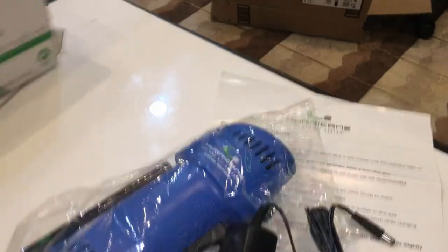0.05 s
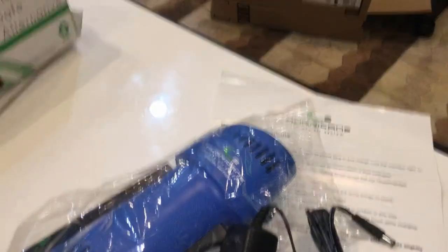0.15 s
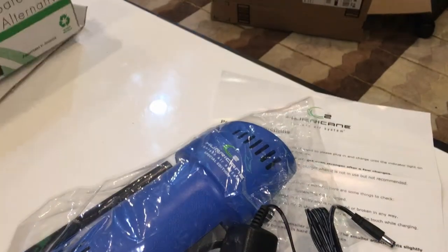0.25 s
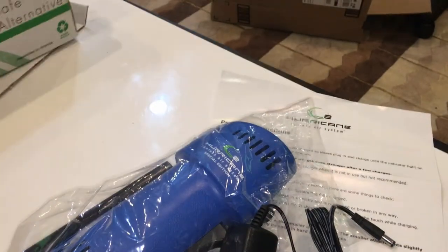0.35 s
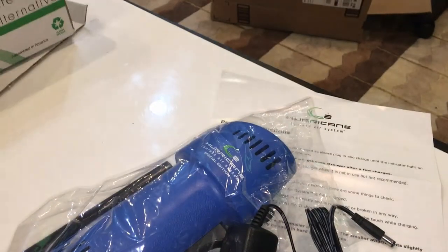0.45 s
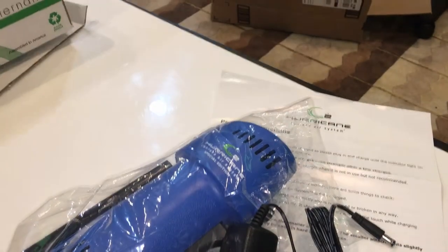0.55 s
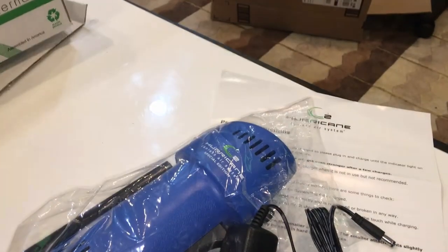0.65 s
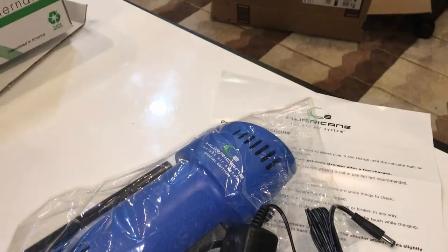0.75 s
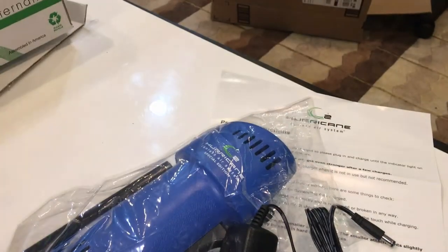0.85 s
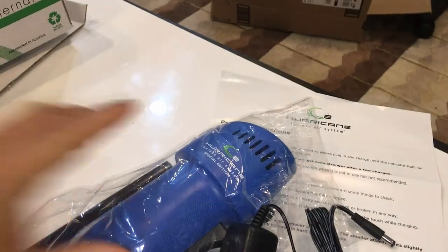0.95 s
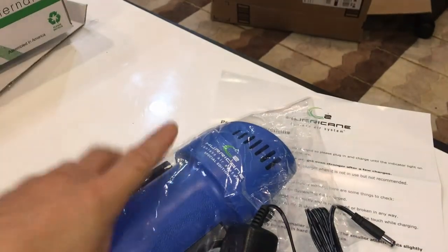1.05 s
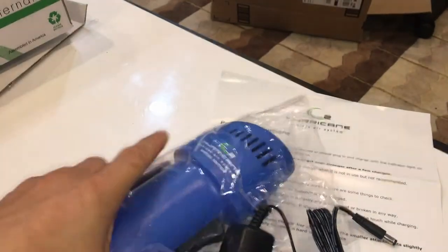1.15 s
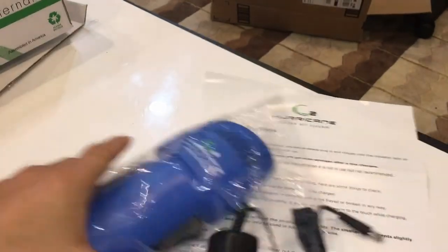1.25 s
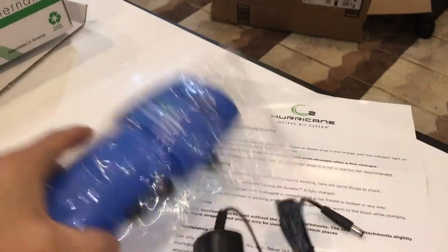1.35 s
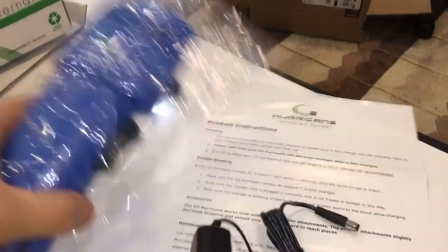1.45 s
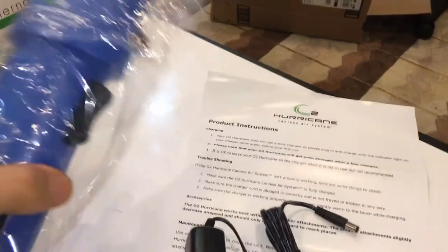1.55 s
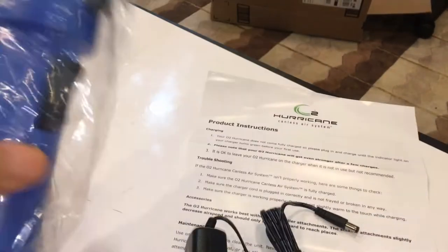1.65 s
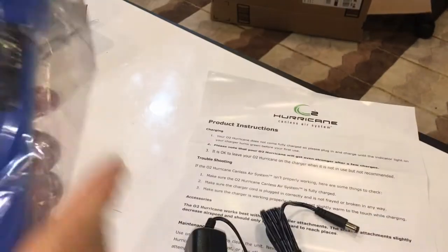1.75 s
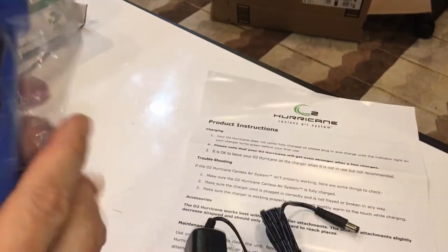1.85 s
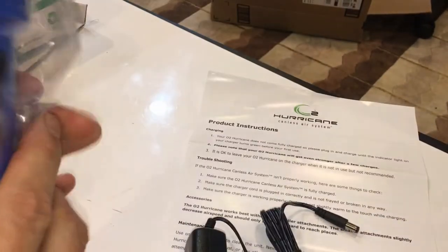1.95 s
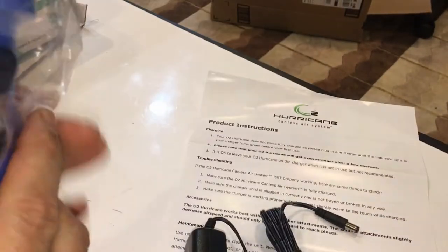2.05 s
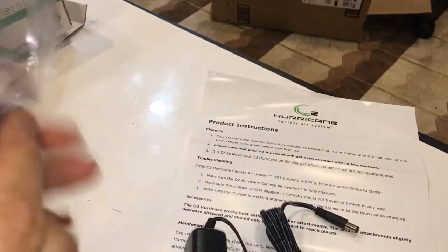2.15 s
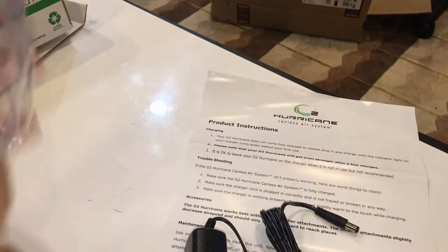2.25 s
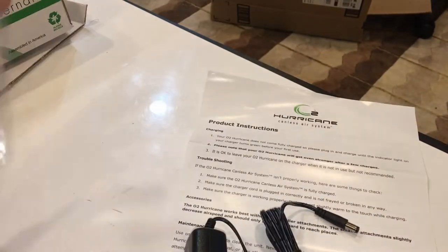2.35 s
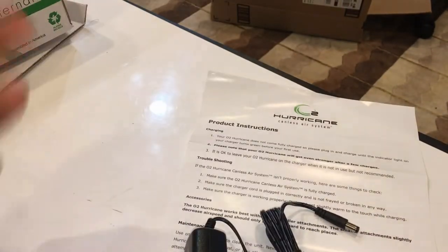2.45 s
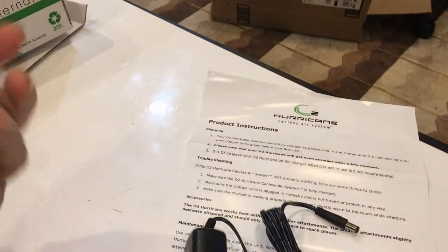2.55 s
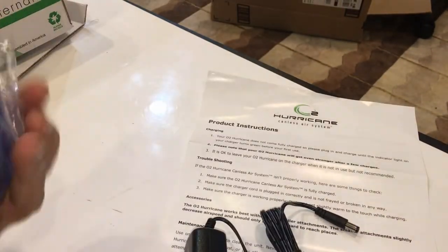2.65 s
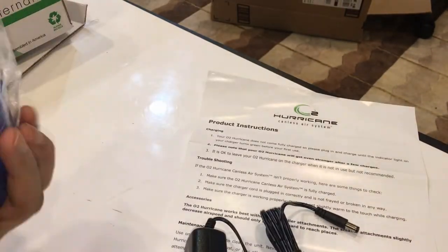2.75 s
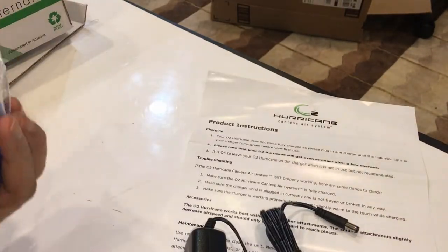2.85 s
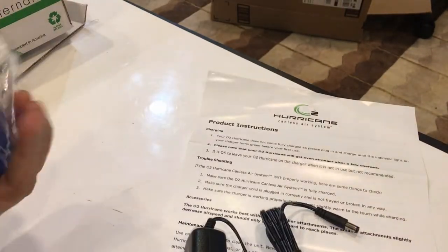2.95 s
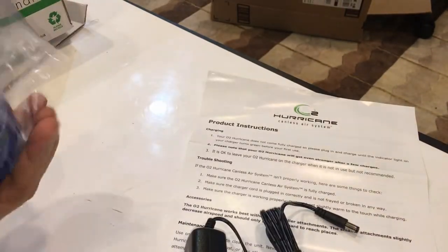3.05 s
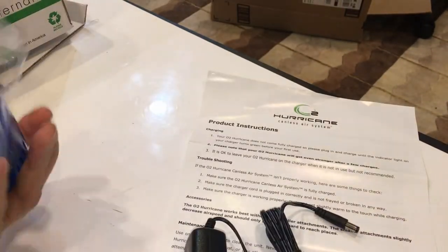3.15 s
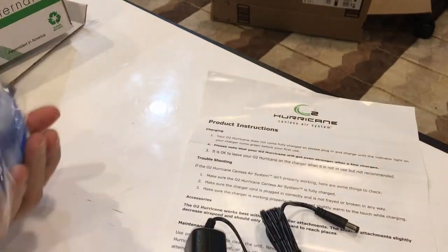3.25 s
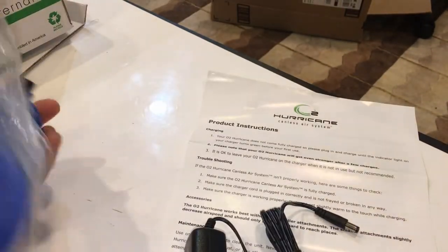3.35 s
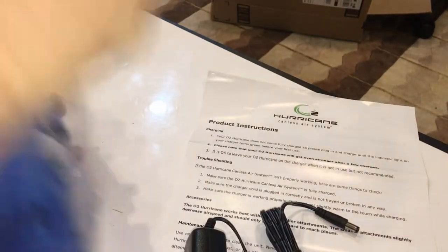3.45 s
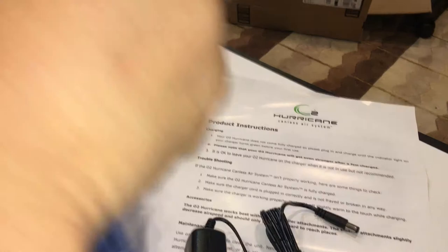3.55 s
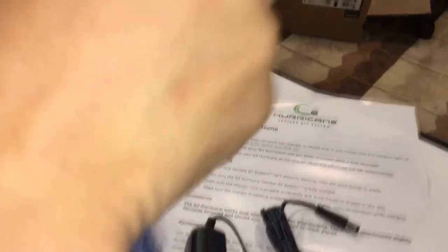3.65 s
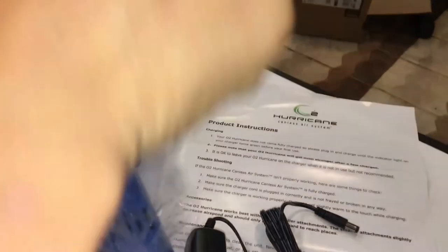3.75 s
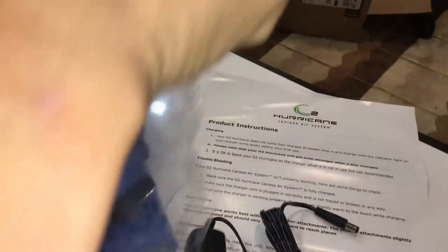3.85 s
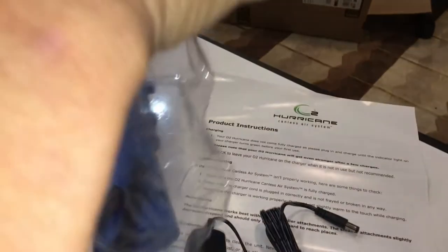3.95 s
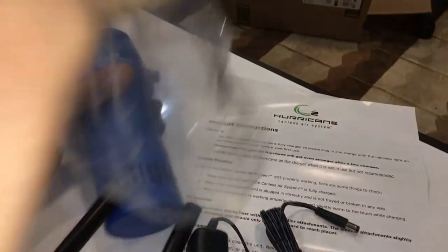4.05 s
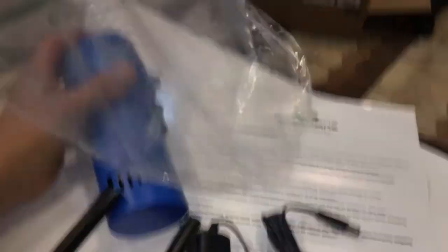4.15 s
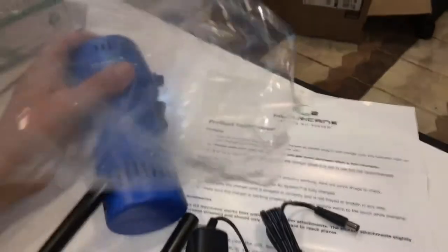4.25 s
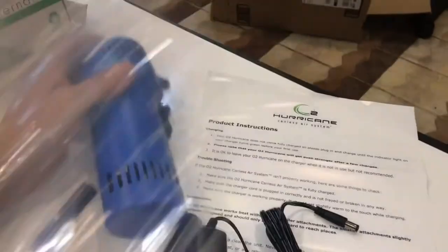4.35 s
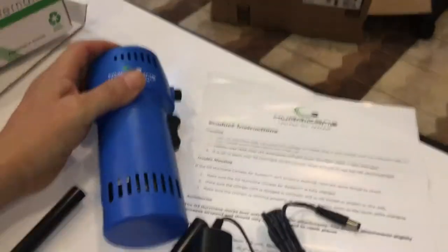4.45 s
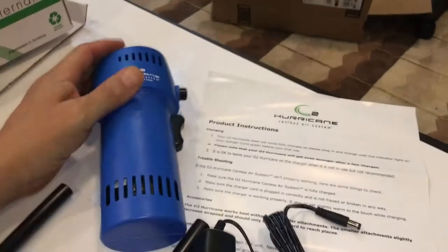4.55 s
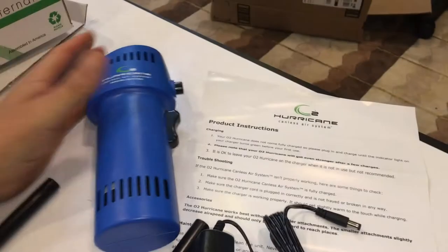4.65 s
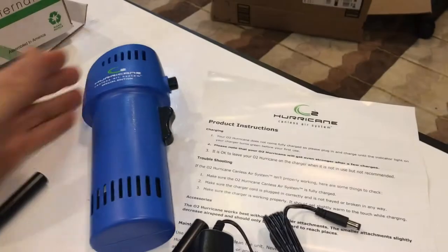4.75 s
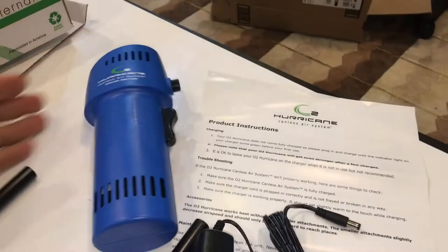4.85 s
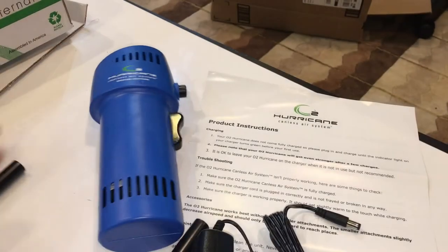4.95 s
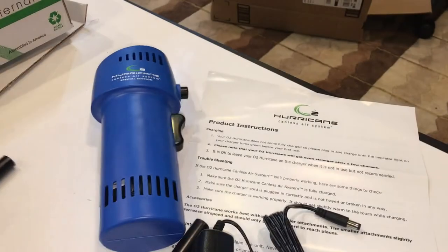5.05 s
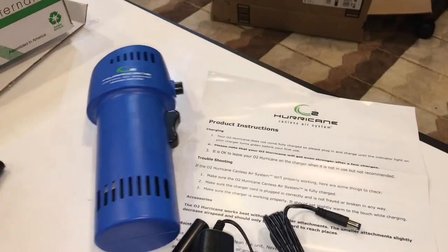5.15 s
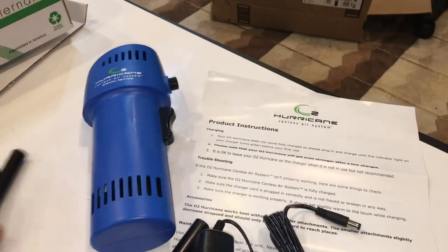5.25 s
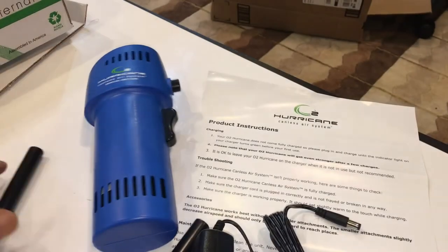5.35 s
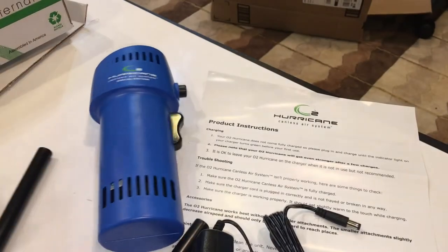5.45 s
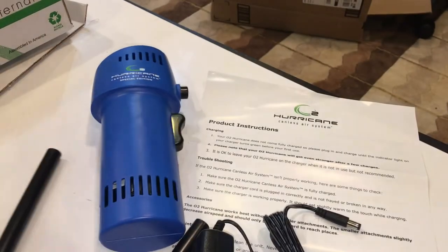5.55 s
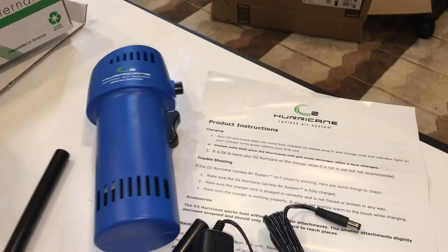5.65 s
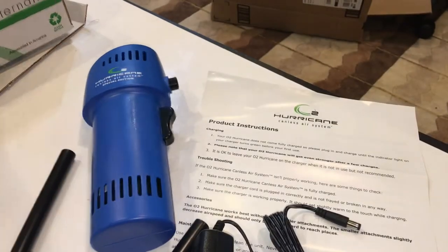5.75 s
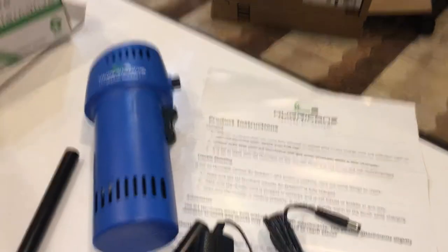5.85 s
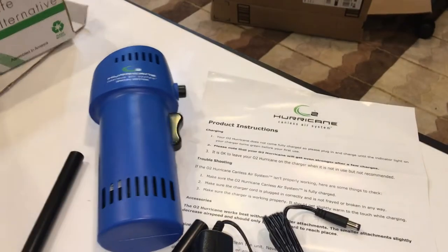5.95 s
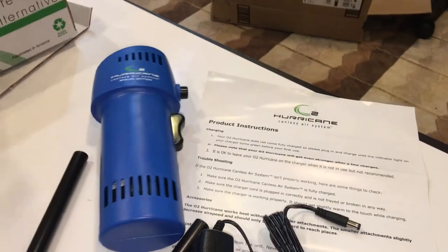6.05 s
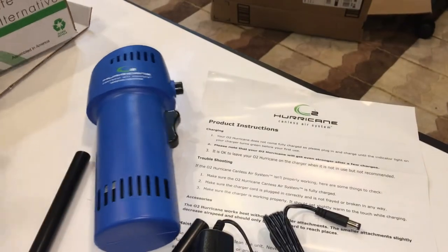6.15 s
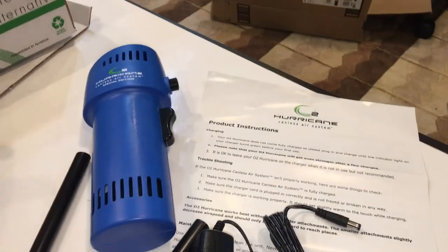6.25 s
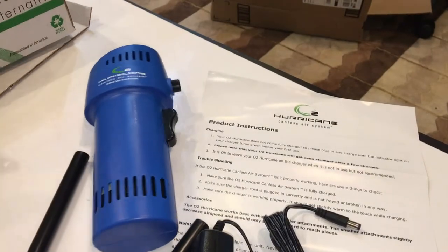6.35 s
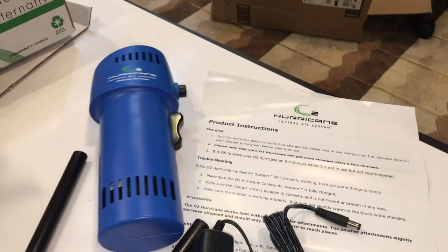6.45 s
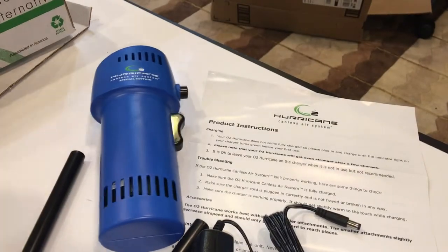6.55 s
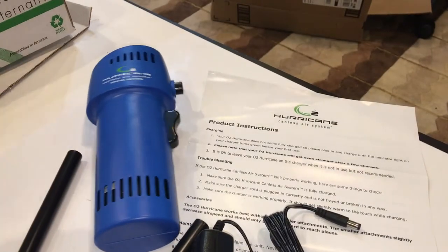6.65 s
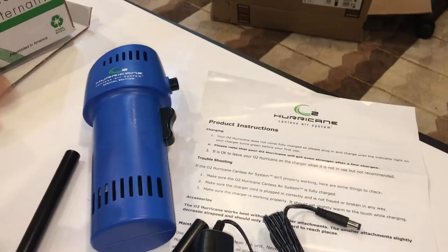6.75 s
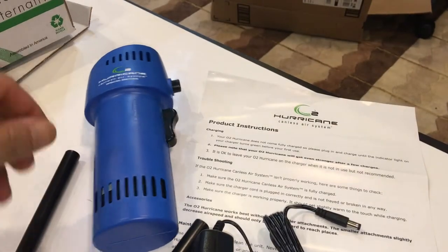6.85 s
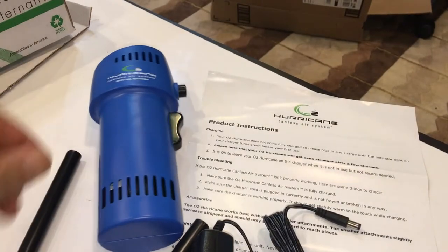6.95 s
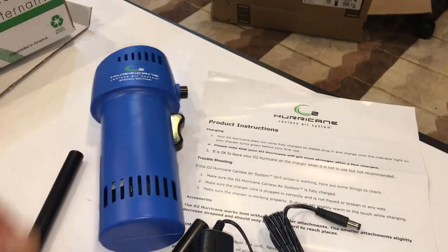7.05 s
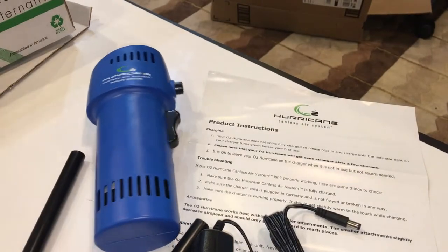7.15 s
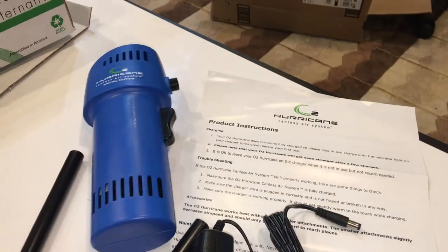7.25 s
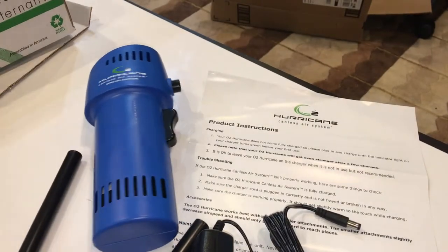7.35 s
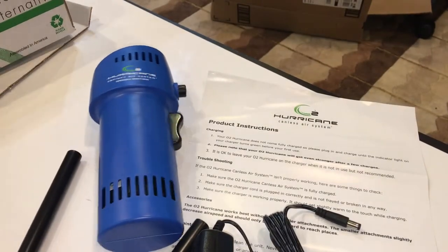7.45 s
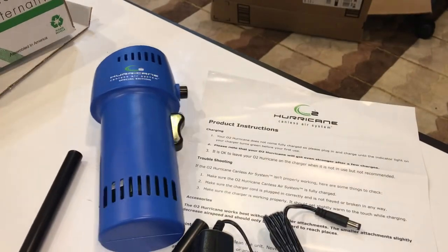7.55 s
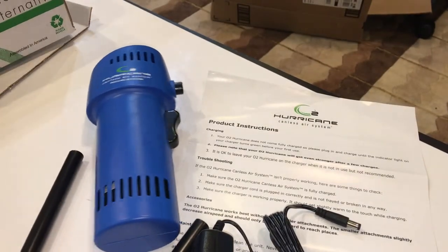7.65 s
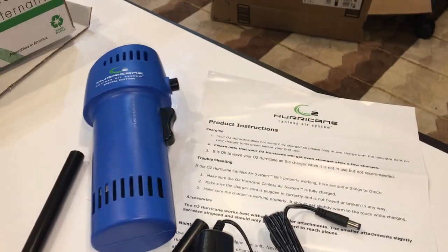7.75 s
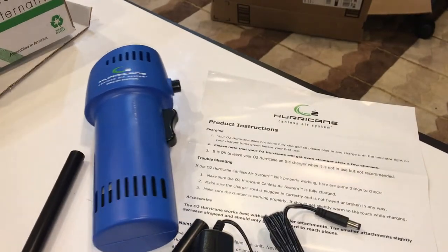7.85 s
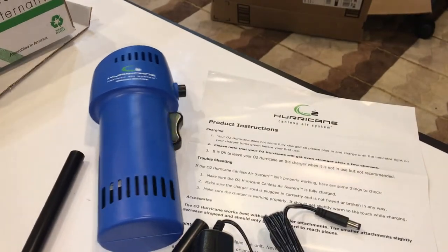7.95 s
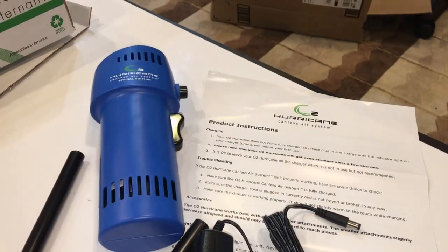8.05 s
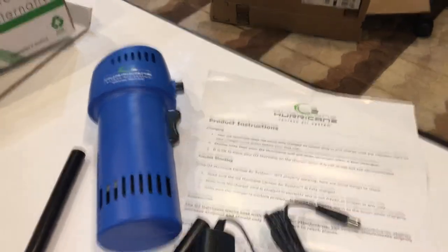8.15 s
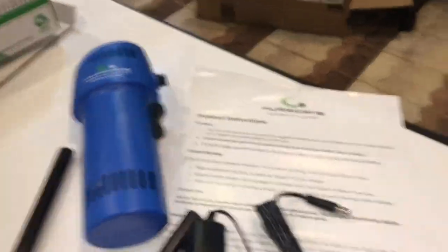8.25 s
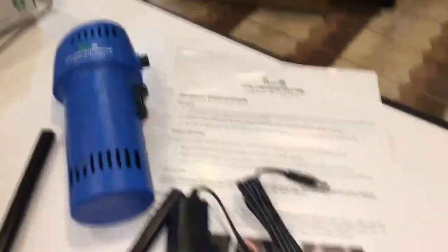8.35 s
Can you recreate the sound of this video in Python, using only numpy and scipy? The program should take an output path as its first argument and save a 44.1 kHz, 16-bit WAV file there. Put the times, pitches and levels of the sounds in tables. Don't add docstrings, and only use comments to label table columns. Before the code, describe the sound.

A carton scuffs aside, then a thin plastic bag crackles sharply as a hollow plastic tool is pulled out and knocked down on a table.

```python
import sys
import numpy as np
from scipy import signal
from scipy.fft import rfft, irfft, next_fast_len
from scipy.io import wavfile
from scipy.ndimage import uniform_filter1d

SR = 44100
rng = np.random.default_rng(int(sys.argv[2]) if len(sys.argv) > 2 else 0)


def nominal_scale(level):
    x = np.asarray(level, float) / 20
    return 10 ** x


def output_pcm(signal):
    pcm = np.clip(np.atleast_2d(signal).T, -1, 1) * 32767
    wavfile.write(sys.argv[1], SR, np.round(pcm).astype(np.int16))


N = 370437

# (frequency [Hz], density [dB per Hz])
FILM_COLOUR = [(880, -31), (1500, -5), (4430, 0), (4940, 0.5), (6080, 4), (7620, -9.5), (9100, -0.5),
               (10400, -10), (13000, -15), (15800, -20)]
# (frequency [Hz], density [dB per Hz])
BAG_COLOUR = [(150, -31), (250, -12.5), (383, 8.5), (502, -20.5), (785, 11), (2130, 3), (3000, 3),
              (3900, -30), (6600, -120)]
# (frequency [Hz], density [dB per Hz])
CARTON_COLOUR = [(880, -35), (1500, -15), (1810, -11), (2100, -11), (3900, 1.5), (8410, 3.5), (15800, -8.5)]
# (time [s], rubbing noise over clicks [ratio])
RUBBING = [
    (1.09, 1.6),
    (1.11, .55),
    (2.39, .55),
    (2.43, 1.3),
    (2.56, 1.3),
    (2.6, .55),
    (5.75, .3),
    (5.79, 1.1),
    (6.33, 1.1),
    (6.38, .4),
]
# (start [s], hold [s], film crackle [dB], bag and table rustle [dB])
GRABS = [(0.127, 0.017, -46, -40.5), (0.179, 0.29, -53, -42), (0.802, 0.066, -74.5, -83),
         (1.145, 0.15, -47.5, -39.5), (1.33, 0.21, -39.5, -38), (1.59, .09, -64.5, -55),
         (1.701, 0.071, -50, -47), (1.81, .04, -53, -50), (1.882, 0.082, -39, -38),
         (2.024, 0.21, -36.5, -35.5), (2.31, .07, -51, -45.5), (2.413, 0.064, -37, -34),
         (2.518, 0.037, -31, -44), (2.604, 0.16, -38.5, -38), (2.767, 0.097, -37, -42),
         (2.93, 0.099, -45, -70), (3.017, 0.2, -34.5, -41.5), (3.27, .055, -48, -44),
         (3.346, 0.11, -40, -34), (3.5, 0.039, -40.5, -39), (3.66, 0.6, -51, -44), (4.155, 0.02, -57, -44),
         (4.384, 0.16, -60.5, -55), (4.528, 0.17, -59, -50.5), (4.781, 0.022, -57.5, -45.5),
         (4.93, 0.19, -66, -51.5), (5.122, 0.23, -47, -43), (5.797, 0.13, -39, -31.5),
         (6.018, 0.23, -50, -40.5), (6.239, 0.025, -46.5, -45), (6.41, 0.067, -57.5, -50.5)]
# (time [s], film crackle [dB], bag and table rustle [dB])
JERKS = [(0.637, -62, -46), (3.762, -40.5, -20), (3.861, -54, -28), (3.905, -50, -28), (4.146, -36, -42),
         (4.068, -57, -32), (4.25, -53, -61), (4.488, -35, -24.5), (4.932, -51, -34), (5.056, -58, -48),
         (5.502, -45, -38.5), (5.642, -72.5, -45.5)]
# (time [s], film peak [dB], bag rustle [dB])
CLUMPS = [(1.165, -14, -28.5), (1.207, -11, -33), (1.2464, -11.5, -26.5), (1.32, -10.5, -34.5),
          (1.3794, -24, -32), (1.4494, -20, -28.5), (1.5, -25, -30.5), (1.541, -24.5, -33),
          (1.886, -19.5, -35.5), (1.929, -18.5, -35), (1.9624, -22, -41), (2.001, -8.5, -37),
          (2.057, -8.5, -43), (2.0931, -13.5, -30.5), (2.142, -18, -41.5), (2.167, -16, -32),
          (2.264, -30, -31.5), (2.4339, -16, -31.5), (2.4508, -13.5, -29.5), (2.4894, -12, -31.5),
          (2.5202, -13.5, -34), (2.544, -4, -32), (2.664, -13, -34.5), (2.8155, -8.5, -33.5),
          (2.8749, -9.5, -31.5), (2.9287, -35, -43), (3.0444, -18.5, -41.5), (3.0944, -10, -30),
          (3.1258, -17.5, -26.5), (3.1632, -20.5, -29.5), (3.2046, -22.5, -40.5), (3.2244, -34.5, -33),
          (3.3712, -13, -26), (3.3982, -21, -43), (3.4206, -15, -37), (3.4444, -19.5, -32),
          (3.5394, -20.5, -35), (5.8277, -19.5, -30), (5.8694, -18, -24), (5.917, -19, -27),
          (6.2475, -21, -34.5), (6.2911, -30, -35.5), (6.3244, -38, -36), (6.4294, -33, -46)]
# (time [s], peak [dB], pitch
# [Hz])
CREASE_SNAPS = [(0.2298, -27, 4500), (0.634, -44, 3400), (0.8135, -52, 8860), (1.1174, -37, 3040),
                (1.1426, -18, 3600), (1.1766, -22, 3040), (1.2088, -14, 4560), (1.2178, -20, 3370),
                (1.2561, -33, 5480), (1.32, -22, 3110), (1.326, -20.5, 3450), (1.3382, -17, 3580),
                (1.3558, -17, 3600), (1.4297, -31, 3470), (1.4995, -19, 5660), (1.5203, -17.5, 6330),
                (1.5433, -10.5, 6200), (1.5594, -13, 8750), (1.5791, -12, 5000), (1.7234, -29, 3780),
                (1.747, -24, 6400), (1.7833, -20.5, 3140), (1.7907, -18.5, 7800), (1.8266, -34, 3930),
                (1.8602, -30, 3890), (1.8667, -17, 3120), (1.888, -17.5, 6200), (1.9078, -10.5, 5200),
                 (1.929, -17, 3230), (1.9539, -14, 3800), (1.9624, -11.5, 2640), (1.9864, -18, 2730),
                 (1.9989, -11.5, 6030), (2.0127, -12.5, 8140), (2.0202, -14.5, 2740), (2.0557, -14, 4840),
                 (2.0677, -14, 5590), (2.0934, -11.5, 3600), (2.1223, -11, 3640), (2.142, -11, 3800),
                 (2.1678, -18.5, 3520), (2.2154, -12.5, 4470), (2.2214, -16.5, 6590), (2.2264, -24.5, 4060),
                 (2.237, -13, 7300), (2.3201, -30.5, 4610), (2.3365, -24, 3820), (2.356, -21.5, 7200),
                 (2.394, -14, 3150), (2.4064, -18, 5900), (2.4116, -14.5, 5150), (2.433, -21, 5150),
                 (2.442, -22, 4410), (2.4524, -13.5, 4400), (2.4615, -18, 3130), (2.4898, -15, 5700),
                 (2.5082, -17, 3070), (2.5202, -15, 6020), (2.5507, -10.5, 6010), (2.5712, -8, 4770),
                (2.6204, -23, 5560), (2.6623, -21, 4510), (2.6763, -4.5, 5730), (2.6894, -7, 5530),
                 (2.7004, -22, 5710), (2.7342, -19, 4400), (2.7414, -21, 6600), (2.7534, -19.5, 6290),
                 (2.7591, -3, 6350), (2.7774, -22, 6370), (2.7954, -16, 7080), (2.815, -19.5, 6240),
                 (2.8204, -23, 5690), (2.8449, -13, 4450), (2.8749, -14, 6620), (2.8784, -19, 3810),
                 (2.8884, -18, 3800), (2.8954, -21, 5290), (2.9287, -21, 4250), (2.9497, -20, 5720),
                 (2.9597, -23, 3160), (2.9721, -18, 4460), (3.0154, -18, 5800), (3.021, -13, 4000),
                 (3.0304, -19.5, 4140), (3.0385, -24, 5700), (3.0444, -15, 3370), (3.1018, -16.5, 3390),
                 (3.1154, -19, 4500), (3.1258, -14.5, 2580), (3.1304, -15.5, 3210), (3.1624, -20.5, 2630),
                 (3.2046, -20.5, 3300), (3.2645, -19.5, 5500), (3.2989, -25, 3990), (3.3363, -31, 4160),
                 (3.3712, -17, 3870), (3.3982, -27, 3040), (3.4201, -27, 3210), (3.4401, -22, 4110),
                 (3.4464, -15, 4150), (3.4735, -18, 4670), (3.5004, -29, 6010), (3.5269, -13.5, 4360),
                 (3.5808, -24.5, 5820),
                (3.6634, -24, 2730), (3.7195, -31, 3170), (3.7537, -24.5, 6400), (3.7608, -11.5, 3090),
                  (3.812, -21, 6240), (3.8634, -26, 3300), (3.8806, -23, 2470), (3.9042, -17.5, 3860),
                  (4.0053, -25, 2600), (4.0701, -28, 2900), (4.146, -21, 3620), (4.166, -30, 2980),
                  (4.2521, -22, 3620), (4.297, -38, 3150), (4.373, -35, 3080), (4.4884, -17, 4500),
                  (4.5124, -17.5, 7800), (4.575, -43, 7070), (4.5908, -28.5, 3580), (4.6463, -26, 7660),
                  (4.6812, -37, 3830), (4.7015, -47, 3110), (4.7463, -39, 4490), (4.781, -31.5, 2750),
                  (4.787, -36, 3830), (4.8233, -32.5, 2780), (4.8663, -35.5, 2590), (4.9365, -24, 4340),
                  (4.945, -43, 3560), (4.959, -49, 2300), (4.833, -47, 5200), (4.7355, -50, 2600),
                  (4.984, -40, 2640),
                (5.0588, -29, 2270), (5.1267, -32, 2250), (5.1476, -21, 2960), (5.1593, -26, 2700),
                      (5.1778, -22, 2260), (5.215, -27, 6760), (5.225, -16.5, 4100), (5.2826, -13, 7000),
                      (5.3082, -22, 2370), (5.3252, -18.5, 3800), (5.3384, -19, 4500), (5.367, -22.5, 3500),
                      (5.434, -36, 4030), (5.4907, -37, 2640), (5.4999, -26, 2210), (5.6416, -45, 2220),
                      (5.7376, -30.5, 6860), (5.7703, -28, 4000), (5.918, -20, 2310), (5.9675, -18, 5850),
                      (6.0214, -26, 2260), (6.2574, -16.5, 2730), (6.291, -42, 5000), (6.3973, -24.5, 2660),
                      (6.4985, -47, 2600), (6.5217, -41, 5530), (6.724, -60, 2350), (8.112, -50, 2600),
                      (8.2671, -48, 2540)]
# (time [s], peak [dB], pitch [Hz])
FOLD_POPS = [(0.138, -21, 910), (0.166, -29, 590), (0.189, -27, 646), (0.244, -29, 921), (0.268, -46, 606),
             (0.577, -42, 603), (0.644, -40, 638), (2.266, -26.5, 754), (2.459, -21, 1080),
             (2.489, -19.5, 1160), (2.709, -21, 2010), (2.838, -17.5, 2030), (2.859, -23, 991),
             (3.034, -18, 2080), (3.104, -15.5, 1590), (3.129, -28, 1930), (3.174, -27, 1220),
             (3.377, -20.5, 1580), (3.399, -20.5, 1520), (3.439, -26, 1550), (3.781, -17.5, 865),
             (3.867, -19.5, 616), (3.911, -24, 1220), (4.011, -21, 1090), (4.046, -32, 1060),
             (4.133, -31, 1080), (4.168, -35, 1110), (4.575, -32, 1280), (4.654, -32, 534),
             (4.68, -36, 1280), (4.748, -34.5, 1250), (4.822, -33, 1370), (4.959, -44, 931),
             (4.982, -30, 1330), (6.304, -44, 1080), (6.337, -41, 1070), (6.407, -40, 619),
             (6.431, -36, 452), (6.459, -37, 651), (6.497, -46, 626), (6.523, -39, 1040),
             (6.532, -47, 1050)]
# (time [s], peak [dB], pitch [Hz], table thud [dB])
KNOCKS = [(0.138, -26.5, 857, -33), (0.23, -19.5, 634, -47), (0.634, -31.5, 640, -42),
          (1.22, -24, 640, -43), (1.414, -26, 1110, -55), (1.499, -29.5, 714, -55), (3.761, -7, 1404, -20),
          (3.863, -18.5, 1153, -45), (3.905, -11.5, 1165, -38), (4.007, -27, 1250, -39),
          (4.07, -23.5, 1100, -50), (4.148, -23.5, 1090, -67), (4.487, -9, 1320, -12.5),
          (4.511, -28, 906, -42), (4.945, -49, 1130, -48), (5.804, -30, 912, -39), (6.255, -28, 619, -62),
          (8.267, -54, 501, -50.5)]
# (frequency [Hz], level [dB], decay by 60 dB [s])
SHELL_MODES = [(628, -4, 0.035), (859, -3, 0.022), (1080, -17, 0.056), (1502, -11.5, 0.023)]
# (frequency [Hz], level [dB], decay by 60 dB [s])
TABLE_MODES = [(118.5, -13, 0.041), (198, 16, 0.045)]
# (time [s], peak [dB], pitch [Hz], length [s])
TUBE_BUMPS = [(1.177, -29, 310, 0.0039), (1.512, -28.5, 360, 0.0095), (1.587, -28.5, 372, 0.0089),
              (1.647, -30.5, 347, 0.0063), (1.694, -38, 280, 0.0089), (2.675, -30, 270, 0.0055),
              (2.843, -37, 320, 0.013), (4.144, -33, 275, 0.014), (4.625, -31.5, 265, 0.01),
              (5.934, -19.5, 336, 0.0037), (8.226, -41.5, 310, 0.012), (8.27, -36.5, 326, 0.0065)]
# (time [s], level [dB])
SLIDE_LEVEL = [(2.88, -55), (2.93, -51), (3.0, -56), (3.03, -58.5), (3.19, -55.5), (3.23, -39), (3.28, -55),
               (3.32, -70), (3.9, -62.5), (3.93, -47), (4.02, -39), (4.09, -50), (4.115, -56), (4.17, -34),
               (4.23, -61.5), (4.45, -61.5), (4.53, -46), (4.62, -52.5), (4.74, -67)]
# (time [s], level [dB], fading time [s])
HAND_JOLTS = [(0.12, -42, 0.024), (0.15, -35, 0.052), (0.19, -41, 0.025), (0.24, -35.5, 0.019),
              (0.65, -42.5, 0.021), (1.19, -35, 0.038), (1.5, -49, 0.11), (2.14, -38.5, 0.08),
              (2.455, -35.5, 0.068), (2.55, -38, 0.04), (2.88, -37.5, 0.033), (3.12, -41, 0.41),
              (3.9, -47, 0.11), (4.24, -39.5, 0.043), (4.5, -23, 0.025), (5.16, -47, 0.14),
              (5.95, -36.5, 0.079), (6.28, -46, 0.02)]
# (frequency [Hz], density [dB per Hz])
HUM_COLOUR = [(15, -39), (25, -11), (59, 3.5), (124, -2), (162, -9.5), (227, -9), (461, -25), (776, -21.5),
              (1400, -34), (1820, -65), (3080, -120)]
# (frequency [Hz], density [dB per Hz])
HISS_COLOUR = [(820, -31), (1400, -1), (3920, -11), (4760, -12), (16000, -23)]
# (frequency [Hz], width [Hz], depth [0-1])
PORT_DIPS = [
    (4970, 150, .5),
    (10450, 510, 0.6),
]

BAG_TOUCHED_S, BAG_STILL_S = 1.1, 6.56
ATTACK_DB_PER_S, RELEASE_DB_PER_S = 797.5, 137
FILM_SAG_DB_PER_S, BAG_SAG_DB_PER_S = 10, 24
JERK_ATTACK_DB_PER_S, JERK_RELEASE_DB_PER_S = 3000, 381
CLUMP_ATTACK_DB_PER_S, CLUMP_RELEASE_DB_PER_S = 1498.5, 452
PUFF_DB, PUFF_FOLLOWS = -40.5, .2
POP_CYCLES = 13
JOLT_RISE_SHARE = 0.28
HUM_DB, HISS_DB = -52.5, -73
DRONE_HZ, DRONE_DB = 119, -57
ROOM_T60_S, WALL_CUT_HZ = 0.18, 1400
TOP_HZ = 15800


def crackle(spectrum, per_s, clump_db, spread_db, cycles, rubbing, wide, count):
    flutter = drift(160)
    flutter = rms_one(flutter - uniform_filter1d(flutter, size=600))
    flutter = np.minimum(flutter, 1.8)
    click_share = 1 / np.sqrt(1 + rubbing ** 2)
    effort = nominal_scale(clump_db * flutter * click_share)
    sizes = nominal_scale(spread_db * np.minimum(rng.exponential(1, N), 3)) * rng.choice([-1, 1], N)
    clicks = sizes * (rng.random(N) < per_s * effort / SR)
    rub = rubbing * rng.standard_normal((2, N))
    pitches = np.geomspace(spectrum[1][0], spectrum[-1][0], count)
    patch = rng.integers(0, count, N)
    out = np.zeros(N)
    for k, hz in enumerate(pitches):
        struck = rms_one(clicks * (wide + (patch == k)))
        drive = (struck + rub[k % 2]) * click_share
        level = nominal_scale(at_hz(spectrum, hz) + 2.97 * drift(20)) * np.sqrt(hz)
        out += (-1) ** k * level * rms_one(ring(drive, hz, cycles / hz))
    return rms_one(out * np.sqrt(effort))


def handling():
    film, bag = [], []
    for s, hold, film_db, bag_db in GRABS:
        film.append(film_db + stroke_db(s, hold, FILM_SAG_DB_PER_S, ATTACK_DB_PER_S, RELEASE_DB_PER_S))
        bag.append(bag_db + stroke_db(s, hold, BAG_SAG_DB_PER_S, ATTACK_DB_PER_S, RELEASE_DB_PER_S))
    for s, film_db, bag_db in JERKS:
        shape = stroke_db(s, 0, 0, JERK_ATTACK_DB_PER_S, JERK_RELEASE_DB_PER_S)
        film.append(film_db + shape)
        bag.append(bag_db + shape)
    for s, peak_db, bag_db in CLUMPS:
        shape = stroke_db(s + 0.003, 0.005, 0, CLUMP_ATTACK_DB_PER_S, CLUMP_RELEASE_DB_PER_S)
        film.append(peak_db - 22.5 + shape)
        bag.append(bag_db - 4.5 + shape)
    return summed(film), summed(bag)


def snaps():
    out, t = np.zeros(N), np.arange(800) / SR
    rows = CREASE_SNAPS
    noise = rng.standard_normal((len(rows), 2, len(t)))
    for (s, peak_db, hz), (ragged, puff) in zip(rows, noise):
        tail = nominal_scale(-60 * t / 0.0067) + 0.24 * nominal_scale(-60 * t / 0.028)
        tick = 3.7 * (t == 0) + ragged * tail
        crease = ring(tick, hz, 7.0 / hz)
        neighbour_hz = hz * (1.7 + .35 * np.tanh(puff[0]))
        neighbour = ring(tick, neighbour_hz, 9.0 / hz)
        wide = band(tick, min(.45 * hz, 3000), min(2.6 * hz, 11500))
        snap = peak_one(crease) + 0.69 * peak_one(neighbour) + 0.7 * peak_one(wide)
        snap[70:] += 0.087 * snap[:-70]
        add(out, s, snap, peak_db + .1)
        puff_db = min(PUFF_DB + PUFF_FOLLOWS * (peak_db + 30.5), peak_db - 6.5)
        add(out, s, band(puff * nominal_scale(-60 * t / 0.016), 610, 1700), puff_db)
    return out


def pops():
    out, t = np.zeros(N), np.arange(1600) / SR
    for (s, peak_db, hz), noise in zip(FOLD_POPS, rng.standard_normal((len(FOLD_POPS), len(t)))):
        push = noise * nominal_scale(-60 * t / 0.017)
        pop = band(ring(push, hz, POP_CYCLES / hz), 0.34 * hz, 4.7 * hz)
        add(out, s, pop, peak_db - 3.5)
    return out


def knocks():
    out, t = np.zeros(N), np.arange(5000) / SR
    chance = rng.standard_normal((len(KNOCKS), len(t) + len(SHELL_MODES)))
    for (s, peak_db, hz, thud_db), draw in zip(KNOCKS, chance):
        noise = draw[:len(t)]
        contact = (t == 0) + 0.1 * noise * nominal_scale(-60 * t / 0.031)
        swell = t / 0.00275 * np.exp(1 - t / 0.0015)
        shell = swell * np.sin(2 * np.pi * hz * t * (1.08 - 15 * t))
        shell += 1.9 * band(noise * nominal_scale(-60 * t / 0.019), 0.43 * hz, 1.15 * hz)
        for (mode_hz, mode_db, t60), uneven in zip(SHELL_MODES, draw[len(t):]):
            level = nominal_scale(mode_db + 2.0 * uneven - 10 * abs(np.log2(mode_hz / hz)))
            shell += np.sign(uneven) * level * ring(contact, mode_hz, t60)
        add(out, s, shell, peak_db - 0.5)
        push = np.sin(np.pi * np.minimum(t / 0.0033, 1))
        thud = sum(nominal_scale(db) * ring(push, f, t60) for f, db, t60 in TABLE_MODES)
        add(out, s, thud, thud_db + 0.5)
    return out


def bumps():
    out, t = np.zeros(N), np.arange(4000) / SR
    for s, peak_db, hz, length in TUBE_BUMPS:
        swell = (t / length) ** 2 * np.exp(-2 * t / length * 1.8)
        add(out, s, swell * np.sin(2 * np.pi * hz * t), peak_db + 0.058)
    return out


def slide():
    grit = rng.standard_normal(N) * nominal_scale(3 * np.clip(drift(40), -2, 1.2))
    s, level_db = np.transpose(SLIDE_LEVEL)
    level = nominal_scale(np.interp(np.arange(N) / SR, s, level_db, left=-120, right=-120))
    return level * rms_one(ring(grit, 1110, 0.01))


def rumble():
    lumps = band(rng.standard_normal(N), 45, 230) * nominal_scale(4 * np.clip(drift(20), -3, 1.8))
    jolts = []
    for s, db, dying in HAND_JOLTS:
        jolts.append(db + stroke_db(s, 0, 0, 10 / (JOLT_RISE_SHARE * dying), 10 / dying))
    return rms_one(lumps) * summed(jolts)


def hum():
    drone = rms_one(ring(rng.standard_normal(N), DRONE_HZ, 0.79))
    hiss = nominal_scale(HISS_DB + 2) * coloured(HISS_COLOUR, flicker_db=1)
    return nominal_scale(HUM_DB) * coloured(HUM_COLOUR, flicker_db=2.5) + nominal_scale(DRONE_DB) * drone + hiss


def room(x):
    size = next_fast_len(N + SR)
    w = 2 * np.pi * np.arange(size // 2 + 1) / size
    dull = 1 / (1 + 1j * w * SR / (2 * np.pi * WALL_CUT_HZ))
    out = np.zeros((2, len(w)), complex)
    for k, lag in enumerate(rng.integers(250, 1300, 16)):
        loop = nominal_scale(-60 * lag / SR / ROOM_T60_S) * dull * np.exp(-1j * w * lag)
        out[k % 2] += loop / (1 - loop) * (-1) ** (k // 2)
    return irfft(out * rfft(x, size), size)[:, :N]


def stroke_db(start, hold, sag, rise, fall):
    t = np.arange(0, N, 64) / SR - start
    return rise * np.minimum(t, 0) - sag * np.clip(t, 0, hold) - fall * np.maximum(t - hold, 0)


def summed(levels_db):
    gain = np.sqrt(np.sum(nominal_scale(np.maximum(levels_db, -200)) ** 2, axis=0))
    return np.interp(np.arange(N) / 64, np.arange(len(gain)), gain)


def coloured(spectrum, flicker_db):
    edges = 22 * 2 ** np.arange(0, 9.6, .5)
    edges = edges[(edges >= spectrum[0][0]) & (edges <= 1.1 * spectrum[-1][0])]
    out, white = 0, rng.standard_normal((2, N))
    for k, (low, high) in enumerate(zip(edges, edges[1:])):
        level = nominal_scale(at_hz(spectrum, np.sqrt(low * high)) + flicker_db * drift(22))
        out = out + level * band(white[k % 2], low, high)
    return rms_one(out)


def ring(clicks, hz, t60):
    r = nominal_scale(-60 / (t60 * SR))
    w = 2 * np.pi * min(hz, .45 * SR) / SR
    return signal.lfilter([0, np.sin(w)], [1, -2 * r * np.cos(w), r * r], clicks + 1e-18)


def drift(rate):
    r = np.exp(-40 * np.pi * rate / SR)
    slow = signal.lfilter([1], [1, -2 * r, r * r], rng.standard_normal(N // 20 + 2002))[2000:]
    return np.interp(np.arange(N) / 20, np.arange(len(slow)), rms_one(slow))


def band(x, low_hz, high_hz):
    return signal.sosfilt(signal.butter(2, [low_hz, high_hz], "band", fs=SR, output="sos"), x)


def at_hz(points, hz):
    f, db = np.transpose(points)
    return np.interp(np.log(hz), np.log(f), db)


def rms_one(x):
    return x / np.sqrt(np.mean(x ** 2) + 1e-20)


def peak_one(x):
    return x / np.max(np.abs(x))


def add(out, s, sound, peak_db):
    i = int(s * SR)
    out[i:i + len(sound)] += (nominal_scale(peak_db) * peak_one(sound))[:N - i]


def scene():
    film_gain, bag_gain = handling()
    t = np.arange(N) / SR
    rubbing = np.interp(t, *np.transpose(RUBBING))
    film = crackle(FILM_COLOUR, per_s=1800, clump_db=4.5, spread_db=0.5, cycles=6.9,
                   rubbing=rubbing, wide=0.048, count=15)
    bag = crackle(BAG_COLOUR, per_s=900, clump_db=3.0, spread_db=3.5, cycles=7.8,
                  rubbing=rubbing, wide=0.084, count=10)
    film = np.where(t < BAG_TOUCHED_S, coloured(CARTON_COLOUR, flicker_db=4.0), film)
    plastic = nominal_scale(2.5) * film_gain * film + nominal_scale(-4.0) * bag_gain * bag
    rustle = (t < BAG_STILL_S) * plastic + slide()
    hits = snaps() + pops() + knocks()
    near = rustle + hits + bumps()
    wet, other = room(near)
    aside = np.maximum(drift(2.8) - .4, 0)
    treble = np.roll(band(near, 5000, 16000), 2)
    side = nominal_scale(-30) * (.5 * drift(9) - 1) * hits
    side += nominal_scale(-32) * drift(6) * rustle
    side += aside * (nominal_scale(-13) * treble - nominal_scale(-28) * near)
    side += nominal_scale(-50) * other
    mid = near + nominal_scale(-15.5) * wet + rumble() + hum()
    return np.array([mid + side, mid - side])


def top_cut(x):
    return signal.sosfilt(signal.butter(12, 16970, fs=SR, output="sos"), x)


def record(dry):
    for hz, width, depth in PORT_DIPS:
        b, a = signal.iirpeak(hz, hz / width, fs=SR)
        dry = dry - depth * signal.lfilter(b, a, dry)
    dry = signal.sosfilt(signal.butter(2, 42, "high", fs=SR, output="sos"), dry)
    dry = .75 * np.tanh(dry / .75)
    dry = signal.sosfilt(signal.cheby2(10, 35, TOP_HZ + 250, fs=SR, output="sos"), dry)
    return top_cut(dry)


dry = scene()
out = record(dry)
output_pcm(out)
```